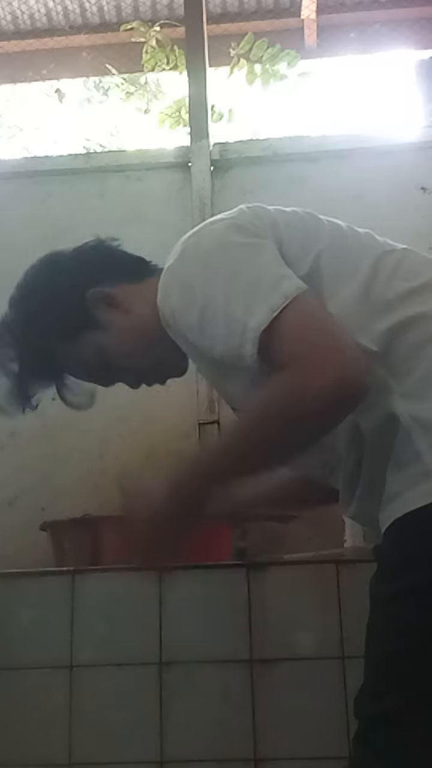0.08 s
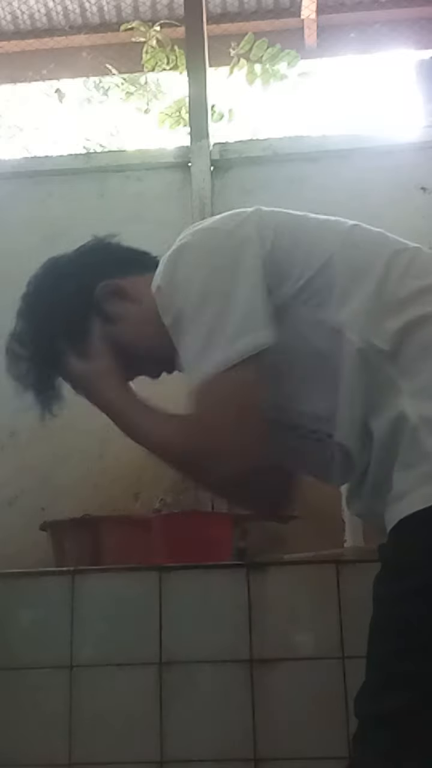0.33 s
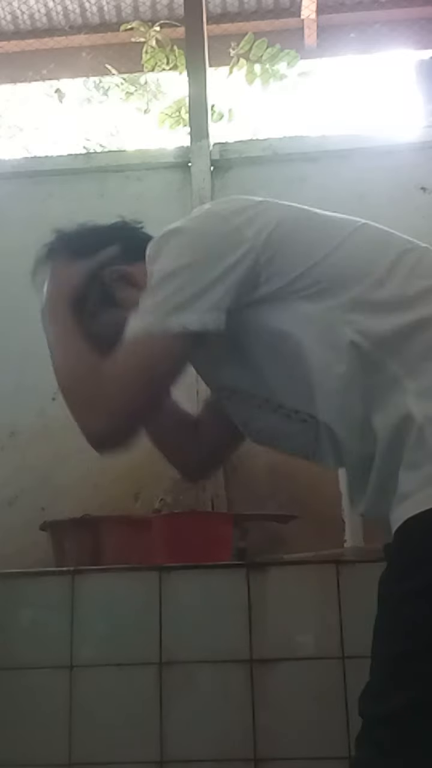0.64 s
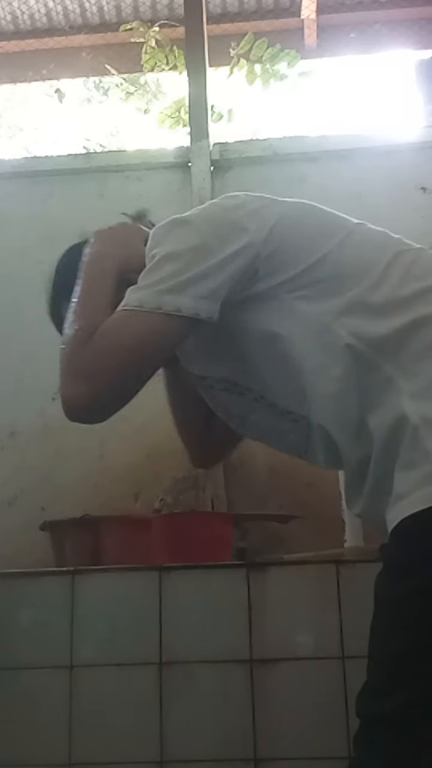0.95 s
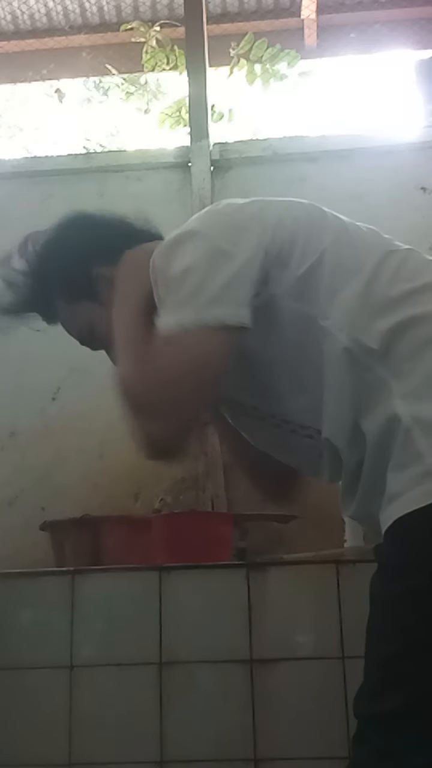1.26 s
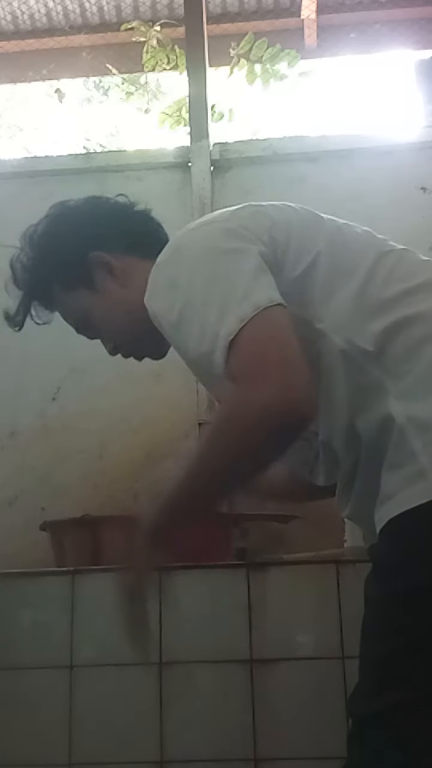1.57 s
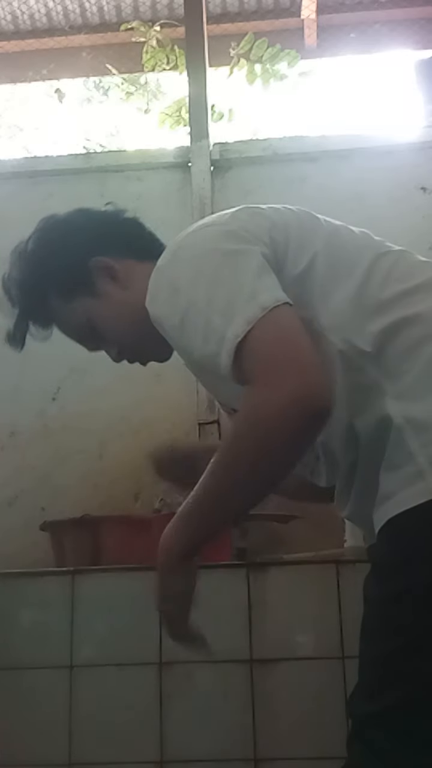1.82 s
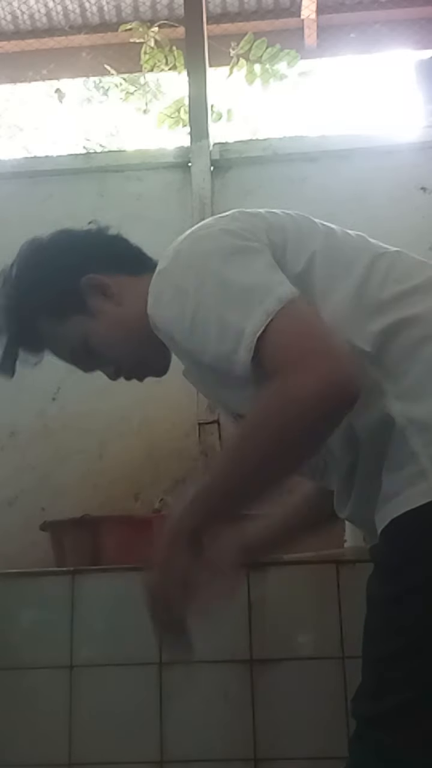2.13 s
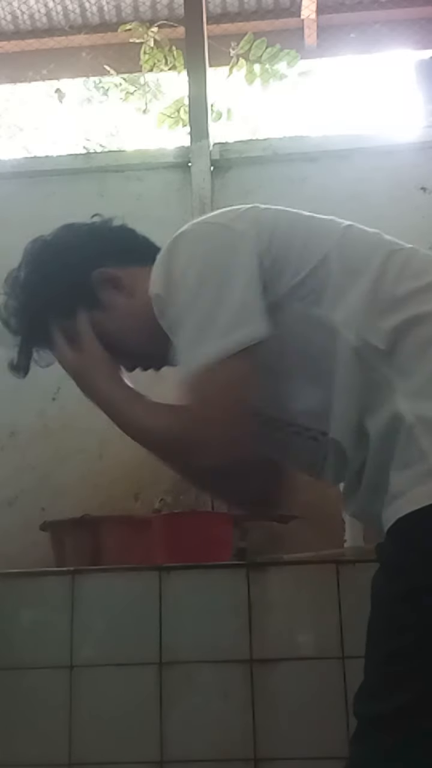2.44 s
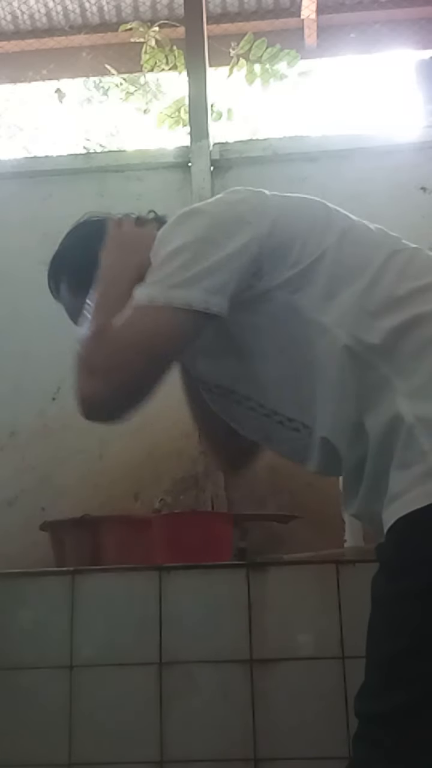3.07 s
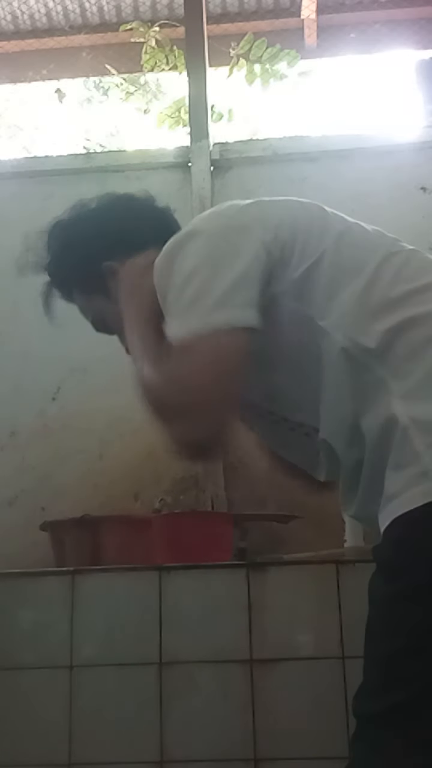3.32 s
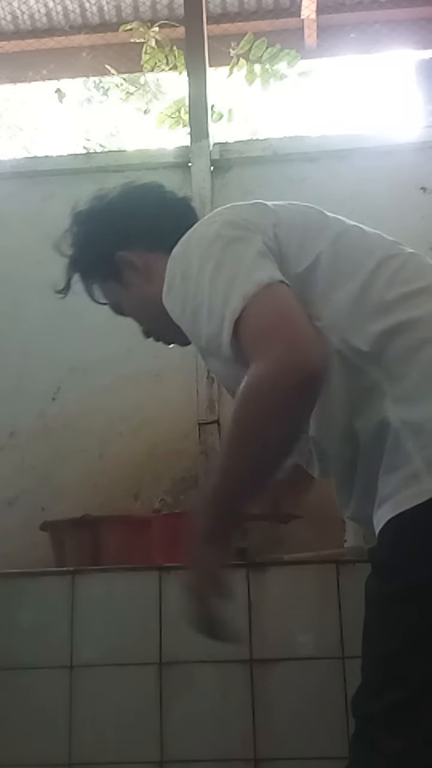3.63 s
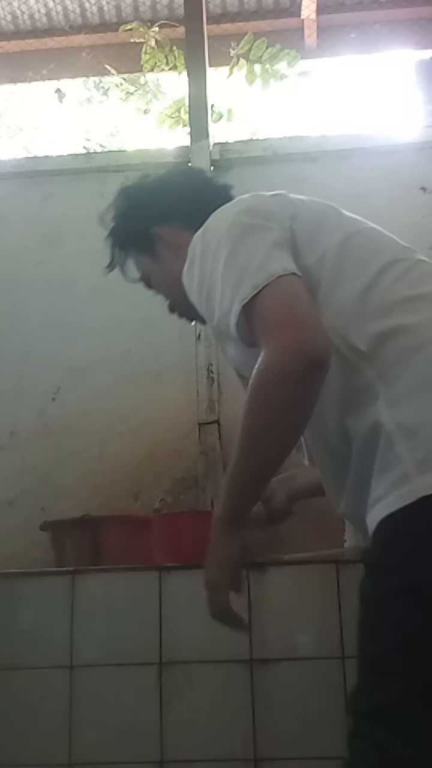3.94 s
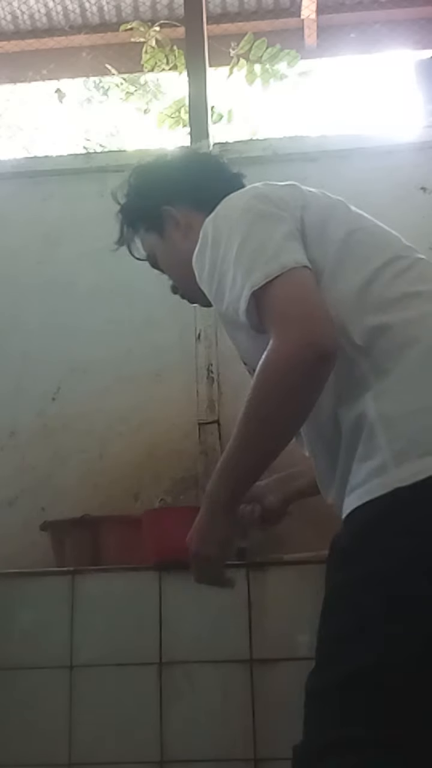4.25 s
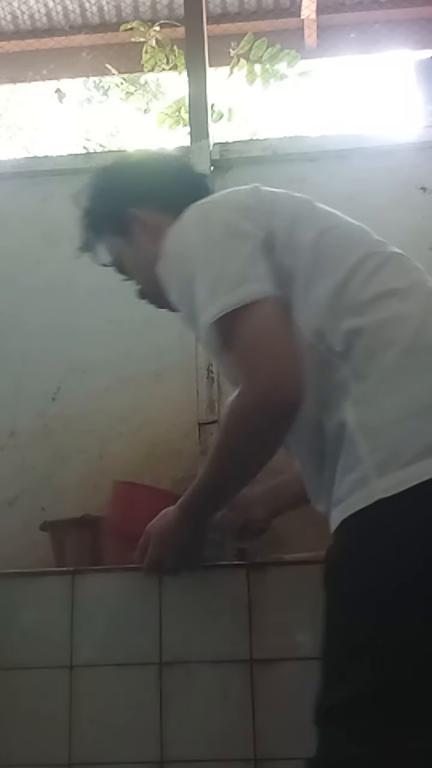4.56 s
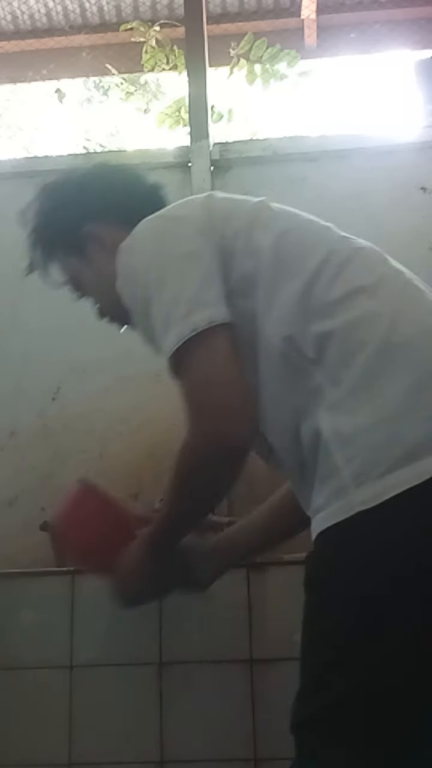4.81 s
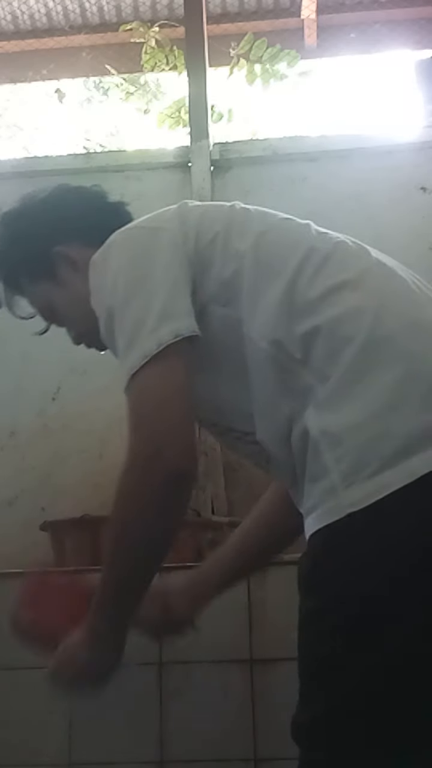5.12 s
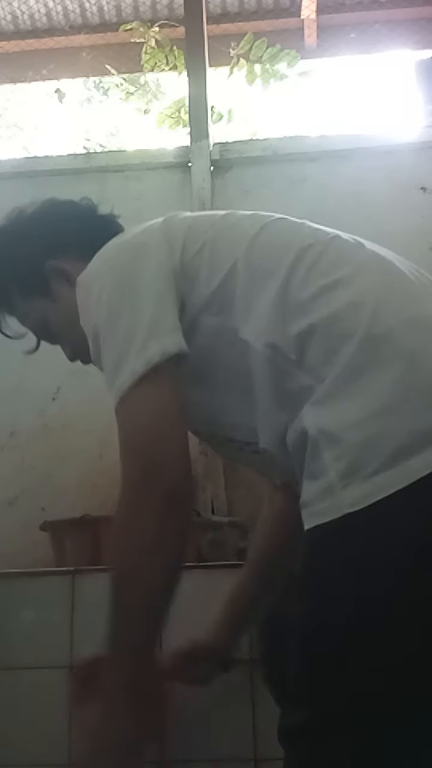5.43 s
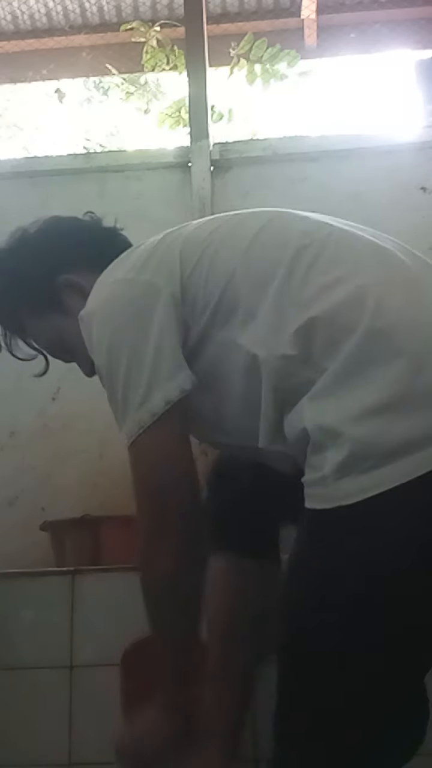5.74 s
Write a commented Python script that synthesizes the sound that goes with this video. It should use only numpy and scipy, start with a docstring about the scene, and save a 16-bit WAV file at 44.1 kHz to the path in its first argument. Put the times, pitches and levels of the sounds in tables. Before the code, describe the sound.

A tap runs steadily into a water tank, gurgling and plopping over a low drumming. Someone washes, and handfuls of water slap down and spatter on the floor in irregular bursts. In the last third a dipper is poured over the feet, making a fuller, continuous splatter with a few glugs. The water sounds close, with a short, bright ring from the small tiled washroom.

```python
"""Small tiled washroom: someone washes at a water tank.
A tap runs into the tank; the stream drums on the water and drags under air that rings as bubbles.
Handfuls go over face and hair, slap down and spatter on the floor; from 6.6 s a dipper is poured
over the feet. Hard walls make every drop ring on."""
import sys
import numpy as np
from scipy import signal
from scipy.fft import rfft, irfft, next_fast_len
from scipy.io import wavfile

SR = 44100
rng = np.random.default_rng(int(sys.argv[2]) if len(sys.argv) > 2 else 0)


def pcm_store(signal):
    """Save signal as 16-bit PCM."""
    levels = np.round(np.clip(np.atleast_2d(signal), -1, 1) * 32767)
    wavfile.write(sys.argv[1], SR, levels.astype(np.int16).T)


N = 409248
TIME_S = np.arange(N) / SR

# tank drone, sinking during the pour: t/s, rumble/dB, boom/dB
DRONE_LEVELS = [(0.0, -54, -51.5), (2.6, -53, -51), (3.15, -59, -49.5), (3.5, -51, -49),
                (4.8, -55.5, -48.5), (5.4, -54, -45.5), (7.06, -55, -50.5), (7.6, -73, -51),
                (9.28, -75, -56.5)]
# low resonances the stream drums on: f/Hz, width/Hz, gain/dB
RUMBLE_MODES = [(65.8, 30, 5), (85.6, 7.5, -11)]
BOOM_MODES = [(123.9, 4.9, 0.5), (189, 16, -23), (232, 12, -16)]
# steady wash of the stream: f/Hz, relative density/dB
WASH_SPECTRUM = [(20, -6), (45, -9), (170, -2), (280, -11), (400, -13.5), (520, 1), (1000, 1.5),
                 (1500, -2.5), (2500, -4), (8000, -9.5)]
# water heaving as the dipper scoops: t/s, length/s, level/dB
SLOSHES = [(4.294, 0.069, -50), (4.46, .08, -51.5), (4.937, 0.047, -48.5), (5.315, .1, -55)]
# air resonances between the tank walls: f/Hz, width/Hz, gain/dB
TANK_MODES = [(620, 11, -13), (734.4, 21, 9), (802, 41, 4), (886, 7.2, 14.5), (934, 20, -12),
              (1303, 25, 1.5)]
# churning of mid-size bubbles: t/s, gain/dB
CHURN = [(0.0, 8), (0.55, -7.5), (1.35, 0.5), (2.28, -10), (2.9, -3), (3.9, -6), (4.3, 5), (4.75, -9.5),
         (6.0, 5.5), (6.85, 4), (7.35, 2), (7.9, 5), (9.28, -4)]
# big bubbles under the tap: t/s, relative level/dB, f/Hz
PLOPS = [(0.201, -27.5, 685), (0.254, -33.5, 844), (0.37, -32, 890), (0.644, -34.5, 885),
         (0.78, -36.5, 754), (1.04, -26, 1294), (1.18, -37, 1130), (1.25, -33.5, 844), (1.321, -33.5, 770),
         (1.366, -34, 640), (1.39, -33, 620), (1.599, -34.5, 933), (1.775, -32.5, 893), (1.849, -32.5, 700),
         (2.494, -33, 1260), (2.57, -39, 790), (2.704, -29, 1430), (2.845, -33.5, 891), (2.911, -32.5, 696),
         (3.014, -24, 766), (3.04, -30, 740), (3.311, -32.5, 752), (3.539, -35, 957), (3.751, -33.5, 1100),
         (3.794, -29.5, 1290), (4.118, -30.5, 725), (4.411, -32.5, 700), (4.449, -28, 643),
         (4.494, -32.5, 700), (4.571, -32.5, 950), (4.949, -30, 886), (5.059, -31.5, 723),
         (5.132, -27.5, 1590), (5.236, -30.5, 800), (5.478, -30, 1130), (5.849, -30, 583),
         (6.086, -26, 841), (6.135, -31, 738), (6.509, -25.5, 1680), (6.669, -34.5, 674),
         (7.063, -32.5, 780), (7.215, -27.5, 1380), (7.636, -27, 915), (7.927, -24, 1610),
         (8.079, -33, 813), (8.315, -28, 596), (8.647, -32.5, 830), (9.061, -36, 822)]
# handfuls on tile and skin: t/s, length/s, spatter/dB, splash re spatter/dB, spray re spatter/dB
SPILLS = [(0.0, 0.044, -37.5, -0.5, -7), (0.072, 0.14, -35.5, -12, -3), (0.183, .1, -29.5, -6, -7),
          (0.627, 0.032, -39, -18, -16), (0.738, 0.066, -37, -1.5, -10), (1.01, 0.054, -46, -5, -7),
          (1.125, 0.022, -38, -22, -5), (1.23, .05, -38, -10, -12), (1.446, 0.19, -39.5, -8, -5),
          (1.763, 0.041, -42, -13, -5), (2.17, 0.044, -37, -2.5, 0.5), (2.303, 0.078, -38.5, -3, 0),
          (2.486, 0.092, -42.5, -4, -3), (2.56, .06, -38.5, -19, -15), (3.204, 0.067, -55, 3, -14),
          (3.473, 0.044, -39, -6, -7), (3.622, 0.046, -40.5, -21, -3), (3.898, 0.071, -39.5, -4.5, -7),
          (4.176, 0.021, -34.5, -15, -4), (4.308, 0.075, -44.5, 0, -9), (4.488, 0.15, -38.5, -4, -6.5),
          (4.685, 0.067, -37.5, -3, -7), (4.863, 0.055, -32.5, -5.5, -3.5), (4.985, 0.29, -44.5, 1.5, -9),
          (5.292, 0.16, -27.5, -6, -7.5), (5.633, 0.13, -38, -3.5, -8), (5.962, 0.19, -36, -3.5, -9.5),
          (6.208, 0.048, -37, -12, -16), (6.308, 0.1, -30.5, -9.5, -6), (6.383, 0.12, -28, -1, -9),
          (6.606, 0.047, -31.5, -5, -9), (6.753, 0.13, -32, -7, -20), (6.877, 0.076, -31.5, -4, -7.5),
          (7.147, 0.11, -33.5, -1, -9), (7.313, 0.064, -34, 2, -15), (7.643, 0.034, -39.5, 6, -8),
          (7.85, 0.084, -31, -9, -11), (8.025, 0.042, -30, -1.5, -17), (8.156, .12, -35, -5, -11),
          (8.324, 0.093, -32.5, -4, -12), (8.566, 0.098, -34.5, -1.5, -8), (8.695, 0.097, -33.5, -0.5, -23),
          (9.056, .06, -33.5, -1.5, -10), (9.244, .05, -33, -1, -9)]
# dipper emptied over the feet: t/s, spatter/dB
POUR = [(6.6, -41), (6.8, -31), (7.1, -35), (7.45, -28), (7.8, -32.5), (8.25, -31), (8.7, -30),
        (9.03, -34.5), (9.28, -29.5)]
# lumps of water landing: t/s, relative level/dB, centre f/Hz, smack re shower/dB
SLAPS = [(0.1124, -14, 6600, -13.5), (0.175, -9, 6440, -6), (0.764, -18.5, 4860, 2),
         (1.0442, -22.5, 3780, 12), (1.511, -22, 4300, -1), (1.9747, -17.5, 6600, 9),
         (2.0356, -16.5, 6300, 9), (2.2829, -7.5, 6120, -9), (2.898, -16.5, 7060, 2), (3.635, -21, 6600, 5),
         (3.9075, -16.5, 6600, 6), (4.1907, -22, 6300, 14), (4.588, -21.5, 4340, -7),
         (4.859, -14.5, 6320, -9), (5.3016, -25, 6250, -0.5), (5.341, -12, 6260, -4), (5.46, -12, 6950, 15),
         (5.5896, -20, 5670, -3), (5.664, -18.5, 5210, 1), (6.006, -12, 6300, -4), (6.382, -12.5, 3280, 7),
         (6.414, -12, 6530, 3), (6.4603, -9, 6500, -2), (6.834, -12.5, 6360, 7), (8.0417, -15, 6050, 7),
         (8.151, -14.5, 4800, -2), (8.2468, -8.5, 6600, -4), (8.422, -8, 6600, 16),
         (8.7055, -10.5, 6140, 3), (8.845, -11, 6270, 0)]
# gushes trapping bubble clusters: t/s, relative level/dB, f/Hz, nominal spread/octaves, length/s
GLUGS = [(0.193, -28, 2560, 0.18, 0.037), (1.04, -35, 3800, 0.086, 0.018), (1.765, -29, 1700, .12, 0.034),
         (3.226, -39, 3250, .08, .04), (4.182, -34, 2000, 0.14, .04), (5.297, -30, 2600, .12, .02),
         (6.391, -25.5, 2980, 0.11, 0.075), (6.42, -32, 1370, 0.22, 0.11), (6.738, -34.5, 1360, 0.27, 0.19),
         (8.866, -18.5, 1935, 0.28, .05), (8.921, -25, 2100, 0.07, 0.039), (8.965, -28, 2220, .05, .03)]
# ring of the tiled room: f/Hz, T60/s
ROOM_T60 = [(100, 0.64), (700, 0.28), (3000, 0.44), (7000, 0.65), (15000, 0.32)]
# response of the two microphone ports: f/Hz, left/dB, right/dB
PORT_RESPONSE = [(101, 2, -0.5), (700, 0.5, -2), (1270, -1, -3.5), (2000, -1.5, -0.5), (2600, 1.5, 3.5),
                 (4000, 1, 3.5), (5550, 3, 7), (6600, 5.5, 12.5), (7710, -2.5, 5.5), (7960, -5.5, -0.5),
                 (10900, -4, -19), (13800, -7.5, -34), (14500, -1.5, -1), (15500, -0.5, -5)]

SWAY_DB, TAP_PATTER_DB = -61.5, -37
CLOUD_DB, CLOUD_LEAD_S, CLOUD_TRAIL_S, CLOUD_OCTAVES = -14, .05, 0.12, .22
DRIBBLE_SPLASH_DB, DRIBBLE_SPATTER_DB, DRIBBLE_SPRAY_DB = -47.5, -41.5, -48   # constant run-off
POUR_SPLASH_DB, POUR_SPRAY_DB = -8, -8   # re pour spatter
FLICKER_DB, DRIP_DB = 1.2, -6   # drips re splash
BREAK_UP_S, SMACK_S = 0.038, .005   # decay time constants
CUTOFF_HZ = 15650


def from_db(db):
    """Decibels to gain."""
    return 10 ** (np.asarray(db) / 20)


def unit_rms(x):
    """Scale to unit power."""
    return x / np.sqrt(np.mean(x ** 2) + 1e-20)


def gain_curves(rows):
    """One gain curve in time per dB column."""
    t_s, *columns_db = np.transpose(rows)
    return [from_db(np.interp(TIME_S, t_s, db)) for db in columns_db]


def at_hz(table, hz, column=1):
    """Table column on a log-frequency axis."""
    table = np.array(table)
    return np.interp(np.log(np.maximum(hz, 1)), np.log(table[:, 0]), table[:, column])


def colour(x, table, column=1):
    """Smooth frequency response."""
    size = next_fast_len(N + SR // 10)
    gain = from_db(at_hz(table, np.fft.rfftfreq(size, 1 / SR), column))
    return irfft(rfft(x, size) * gain, size)[..., :N]


def band(x, low_hz, high_hz, order=2):
    """Butterworth band-pass."""
    edges_hz = np.clip([low_hz, high_hz], 10, .47 * SR)
    return signal.sosfilt(signal.butter(order, edges_hz, "band", fs=SR, output="sos"), x + 1e-18)


def resonate(x, modes):
    """Parallel resonators: f/Hz, width/Hz, gain/dB."""
    out = 0
    for hz, width_hz, db in modes:
        r = np.exp(-np.pi * width_hz / SR)
        b = np.array([1, 0, -1]) * (1 - r * r) / 2
        a = [1, -2 * r * np.cos(2 * np.pi * hz / SR), r * r]
        out = out + from_db(db) * signal.lfilter(b, a, x + 1e-18)
    return out


def drift(per_s):
    """Slow random curve, spread about 1."""
    return np.interp(TIME_S * per_s, np.arange(N // 100), rng.standard_normal(N // 100))


def surge(start_s, length_s, attack_s, release_s):
    """Envelope: linear rise, hold, exponential fall."""
    age_s = TIME_S - start_s
    return np.clip(age_s / attack_s, 0, 1) * np.exp(-np.clip((age_s - length_s) / release_s, 0, 30))


def add(out, t_s, sound):
    """Mix a short sound in at t_s."""
    start = max(0, round(t_s * SR))
    out[..., start:start + sound.shape[-1]] += sound[..., :max(0, N - start)]


def room(x, wet_db):
    """Direct sound plus dense tile reflections; both ports hear the same bass."""
    t_s = TIME_S[:SR * 2 // 3]
    edges_hz = np.geomspace(60, 20000, 10)
    tail = 0
    for low_hz, high_hz in zip(edges_hz, edges_hz[1:]):
        hz = np.sqrt(low_hz * high_hz)
        coherence = 1 / (1 + (hz / 850) ** 2)
        mid, side = band(rng.standard_normal((2, len(t_s))), low_hz, high_hz)
        stereo = np.sqrt(1 + coherence) * mid + np.sqrt(1 - coherence) * side * [[1], [-1]]
        tail = tail + stereo * np.exp(-np.log(1000) * t_s / at_hz(ROOM_T60, hz))
    tail = unit_rms(tail * (t_s > .003)) / np.sqrt(len(t_s))
    return x + from_db(wet_db) * signal.fftconvolve(np.atleast_2d(x), tail, axes=-1)[:, :N]


def scattered(x, wet_db, spots):
    """Water lands all over the floor; each spot has its own reflections."""
    spot = rng.integers(0, spots, N // 128 + 1).repeat(128)[:N]
    return sum(room(x * (spot == k), wet_db) for k in range(spots))


def tank_drone():
    """The plunging stream drums on the water, which sways and sloshes under a soft wash."""
    rumble_gain, boom_gain = gain_curves(DRONE_LEVELS)
    push = rng.standard_normal((2, N))
    rumble = unit_rms(band(resonate(push[0], RUMBLE_MODES), 53, 131, order=3))
    boom = unit_rms(band(resonate(push[1], BOOM_MODES), 132.6, 227.7, order=3))
    drone = from_db(-0.5) * rumble_gain * rumble + from_db(-3.0) * boom_gain * boom
    swirl, wash = rng.standard_normal((2, 1, N)) + 0.43 * rng.standard_normal((2, 2, N))
    heave = sum(from_db(db) * surge(t_s, length_s, attack_s=0.026, release_s=0.034)
                for t_s, length_s, db in SLOSHES)
    slosh = np.hypot(from_db(SWAY_DB), heave) * unit_rms(band(swirl, 277, 518))
    return drone + slosh + from_db(-44) * unit_rms(colour(wash, WASH_SPECTRUM))


def bubble(hz, cycles, rise):
    """Trapped air rings, 60 dB down after `cycles`; pitch climbs as it nears the surface."""
    t_s = TIME_S[:SR // 10]
    age = t_s * hz / cycles
    phase = 2 * np.pi * hz * np.cumsum(1 + rise * (np.minimum(age, 1) - .2)) / SR
    return np.sin(phase) * np.exp(-np.log(1000) * age) * (1 - np.exp(-t_s * hz))


def bubble_crowd(low_hz, high_hz, spread_db, tilt_db_oct, cycles, count):
    """Bubbles of uneven strength at random times."""
    out = np.zeros(N)
    for (when, pitch), force in zip(rng.random((count, 2)), rng.standard_normal(count)):
        hz = low_hz * (high_hz / low_hz) ** pitch
        db = spread_db * min(force, 1.6) + tilt_db_oct * np.log2(hz / low_hz)
        add(out, when * N / SR, from_db(db) * bubble(hz, cycles, rise=0.21))
    return unit_rms(out)


def in_tank(water, modes_db, lag_s):
    """Ring between the tank walls; the tank lies to one side, so the left port lags."""
    water = band(water + from_db(modes_db) * resonate(water, TANK_MODES), 470, 6300, order=4)
    left = np.interp(TIME_S - lag_s, TIME_S, water)
    return room(np.array([left, water]), wet_db=1.5)


def tap_stream(gurgle_db, trickle_db):
    """The stream drags air under: mid-size bubbles gurgle, small ones trickle."""
    gurgle = bubble_crowd(557.5, 1124, spread_db=3.5, tilt_db_oct=6.0, cycles=27.6, count=600)
    trickle = bubble_crowd(978, 2195, spread_db=2.0, tilt_db_oct=1.5, cycles=44, count=380)
    water = from_db(gurgle_db) * gain_curves(CHURN)[0] * gurgle + from_db(trickle_db) * trickle
    return in_tank(water, modes_db=-2.5, lag_s=0.00026)


def flows():
    """Splash, spatter and spray gains: dribble, pour and spills add in power; each gain flickers."""
    pour = gain_curves(POUR)[0] * (TIME_S > POUR[0][0])
    power = from_db([[DRIBBLE_SPLASH_DB], [DRIBBLE_SPATTER_DB], [DRIBBLE_SPRAY_DB]]) ** 2
    power = power + (from_db([[POUR_SPLASH_DB], [0], [POUR_SPRAY_DB]]) * pour) ** 2
    for t_s, length_s, db, splash_db, spray_db in SPILLS:
        shape = surge(0, length_s, attack_s=.018, release_s=0.046)[:SR // 2]
        add(power, t_s, (from_db([[db + splash_db], [db], [db + spray_db]]) * shape) ** 2)
    return [np.sqrt(p) * from_db(FLICKER_DB * drift(per_s=28)) for p in power]


def droplets(per_s, spread_db):
    """Random impacts of uneven size; each lands elsewhere, so has its own left-port lag."""
    hits = np.flatnonzero(rng.random(N) < per_s / SR)
    sizes = from_db(spread_db * np.minimum(rng.exponential(1, N), 4.5)) * rng.choice([-1, 1], N)
    lag_samples = rng.integers(-4, 20, N)[hits]
    out = np.zeros((2, N))
    out[0, np.clip(hits + lag_samples, 0, N - 1)] = sizes[hits]
    out[1, hits] = sizes[hits]
    return out


def patter(flow, ticks_per_s, pings_per_s, clump_db, ping_db):
    """Clumps of drops, denser with flow: bare ticks, and tiny bubbles ringing a few cycles."""
    clumps = from_db(clump_db * drift(per_s=35))
    ticks = unit_rms(droplets(ticks_per_s * flow * clumps, spread_db=3.5))
    pings = 0
    for hz in np.geomspace(1300, 15000, 14):
        impacts = droplets(pings_per_s * flow * hz / 5000, spread_db=4.0)
        pings = pings + np.sqrt(hz) * unit_rms(resonate(impacts, [(hz, hz * 0.16, 0)]))
    return unit_rms((ticks + from_db(ping_db) * unit_rms(pings)) * np.sqrt(clumps / flow))


def falling_water():
    """Thick splashes sound low and trap air; drops on tile sound higher, fine spray highest."""
    splash, spatter, spray = flows()
    drops = patter(spatter / spatter.mean(), ticks_per_s=1300, pings_per_s=130, clump_db=3, ping_db=-3)
    drops = unit_rms(scattered(drops, wet_db=2.5, spots=4))
    drips = bubble_crowd(1945, 4783, spread_db=3.0, tilt_db_oct=9, cycles=64, count=330)
    drips = unit_rms(room(drips, wet_db=3.5))
    thud = from_db(-4) * splash * band(drops, 226, 520)
    low = np.hypot(from_db(TAP_PATTER_DB), from_db(3.5) * splash) * band(drops, 1290, 2140, order=3)
    middle = splash * (from_db(7.5) * band(drops, 2474, 3930, order=3) + from_db(DRIP_DB) * drips)
    high = from_db(3.5) * spatter * band(drops, 4640, 8480, order=3)
    mist = from_db(11.5) * spray * band(drops, 8800, SR / 2, order=3)
    return thud + low + middle + high + mist


def slaps(gain_db):
    """A lump of water smacks down and breaks into a dying shower."""
    out = np.zeros((2, N))
    t_s = TIME_S[:SR // 5]
    attack = np.minimum(t_s / .001, 1)
    for start_s, db, hz, smack_db in SLAPS:
        decay = np.exp(-t_s / BREAK_UP_S) + from_db(smack_db) * np.exp(-t_s / SMACK_S)
        shower = rng.standard_normal((2, len(t_s))) * attack * decay
        burst = band(shower, hz * 0.76, hz * 1.21) + from_db(-10) * band(shower, hz * .5, 11000)
        gain = from_db(db + gain_db - at_hz(PORT_RESPONSE, hz, column=2))   # offsets the port resonance
        add(out, start_s, gain * burst / burst[:, :SR // 100].std())
    return scattered(out, wet_db=-3.5, spots=2)


def plop(hz, cloud_count=9):
    """One big bubble at CLOUD_LEAD_S, a smaller one torn off after it, a cloud of little ones around."""
    out = np.zeros(SR // 2)
    add(out, CLOUD_LEAD_S, bubble(hz, cycles=41.4, rise=.04))
    torn_s = CLOUD_LEAD_S + rng.uniform(0.018, .06)
    add(out, torn_s, from_db(-8.5) * bubble(hz * rng.uniform(1, 1.08), cycles=33, rise=0.048))
    for when, pitch in rng.random((cloud_count, 2)):
        little = bubble(hz * 2 ** (CLOUD_OCTAVES * (2 * pitch - .5)), cycles=35, rise=0.06)
        add(out, when * (CLOUD_LEAD_S + CLOUD_TRAIL_S), from_db(CLOUD_DB) * little)
    return out


def tap_plops(gain_db, spots=2):
    """Big bubbles under the tap, alternating between spots in the tank."""
    out = 0
    for spot in range(spots):
        water = np.zeros(N)
        for t_s, db, hz in PLOPS[spot::spots]:
            add(water, t_s - CLOUD_LEAD_S, from_db(db + gain_db) * plop(hz))
        out = out + in_tank(water, modes_db=-13.5, lag_s=0.00023)
    return out


def glugs(gain_db, count=44):
    """A gush folds air into the water: many like-sized bubbles start almost together."""
    out = np.zeros((2, N))
    for t_s, db, hz, spread_oct, length_s in GLUGS:
        for when, pitch, lag in rng.uniform(-1, 1, (count, 3)):
            bubble_hz = hz * 2 ** (1.34 * spread_oct * pitch)
            pop = from_db(db + gain_db) * bubble(bubble_hz, cycles=18, rise=.12)
            start_s = t_s + length_s * abs(when)
            add(out[0], start_s + lag * .0004, pop)
            add(out[1], start_s, pop)
    return room(out, wet_db=-5.0)


def scene():
    """Washing in front of the running tap."""
    washing = falling_water() + slaps(gain_db=-9) + glugs(gain_db=3.5)
    tap = tap_stream(gurgle_db=-54, trickle_db=-47.0) + tap_plops(gain_db=6.0) + tank_drone()
    return washing + tap


def record(dry):
    """Resonances of each microphone port, then a steep low-pass."""
    heard = np.array([colour(dry[0], PORT_RESPONSE, column=1), colour(dry[1], PORT_RESPONSE, column=2)])
    return signal.sosfilt(signal.ellip(12, .1, 80, CUTOFF_HZ, fs=SR, output="sos"), heard)


dry = scene()
out = record(dry)
pcm_store(out)
```